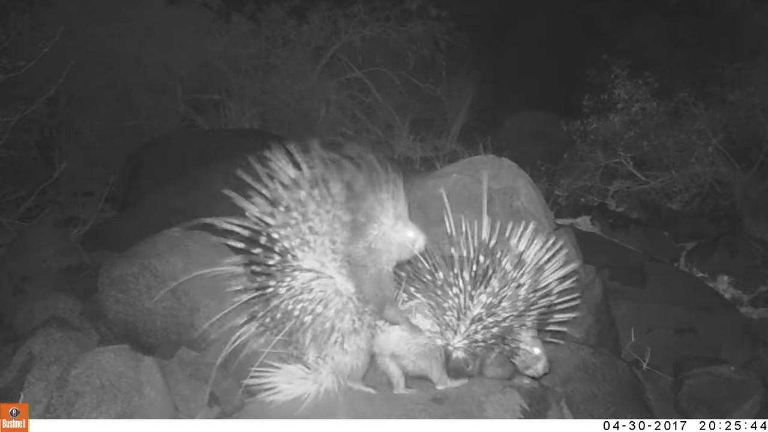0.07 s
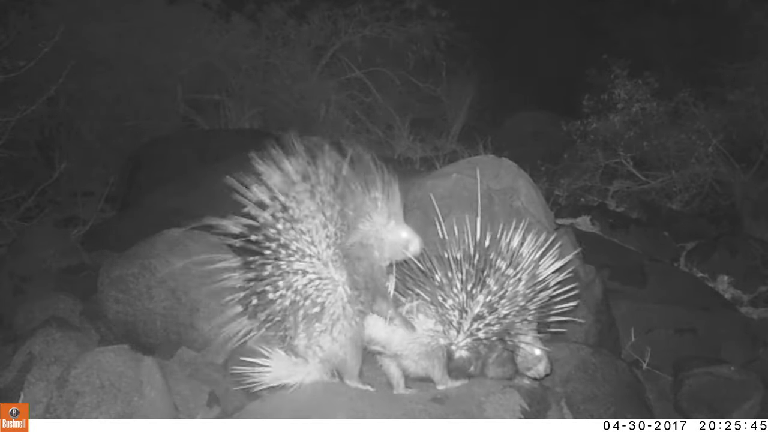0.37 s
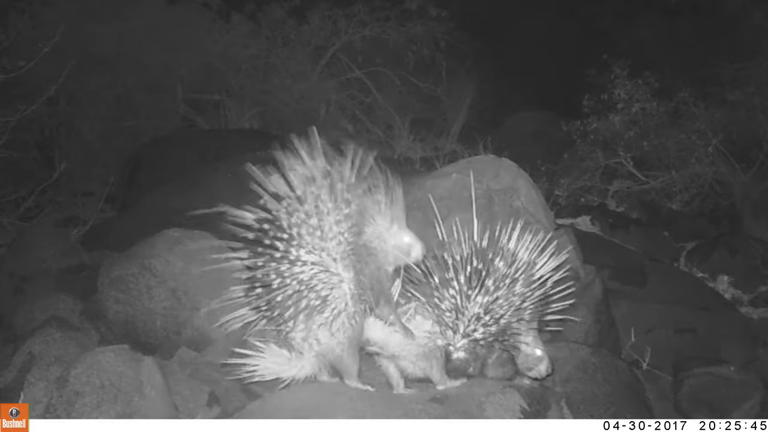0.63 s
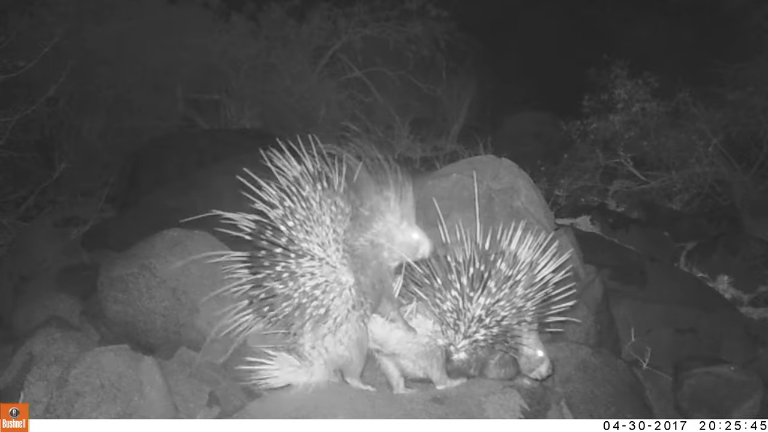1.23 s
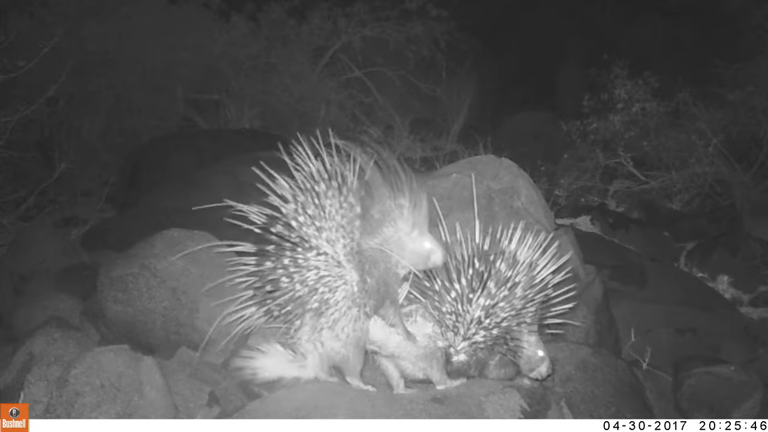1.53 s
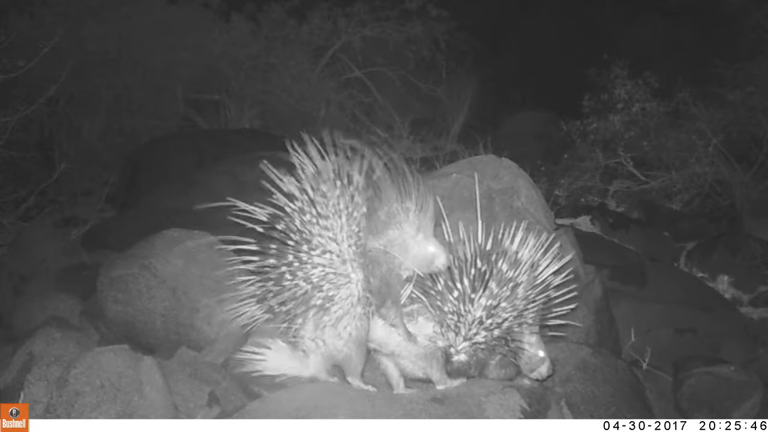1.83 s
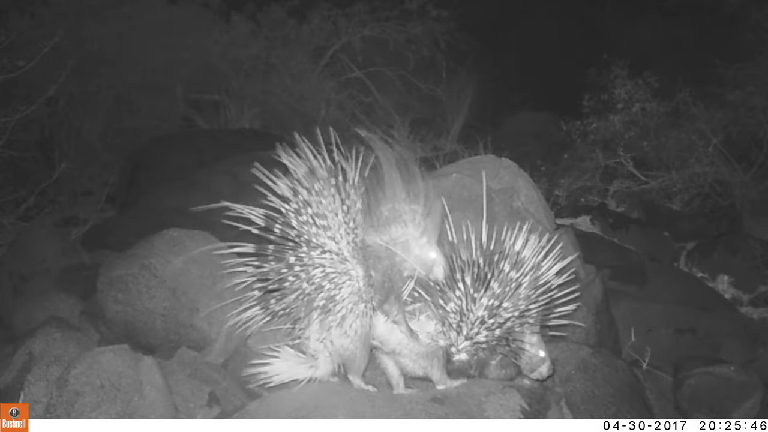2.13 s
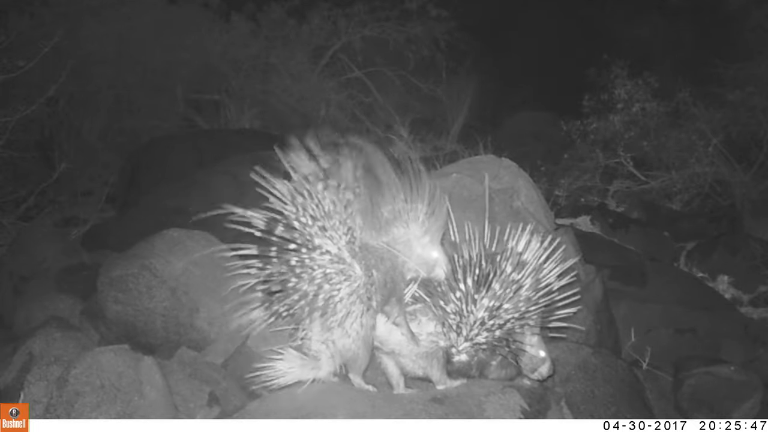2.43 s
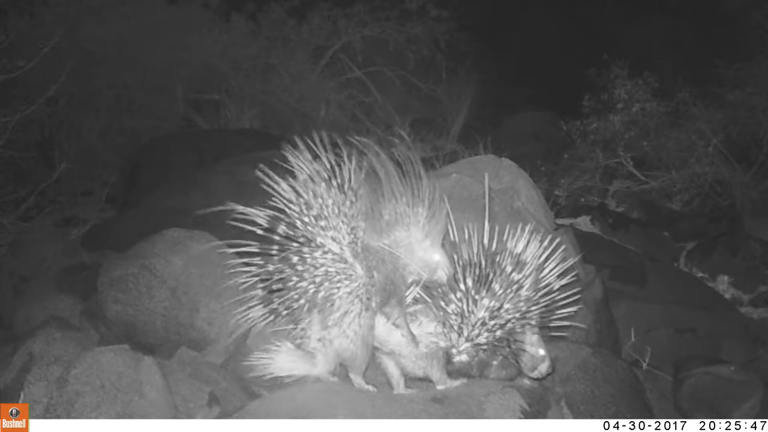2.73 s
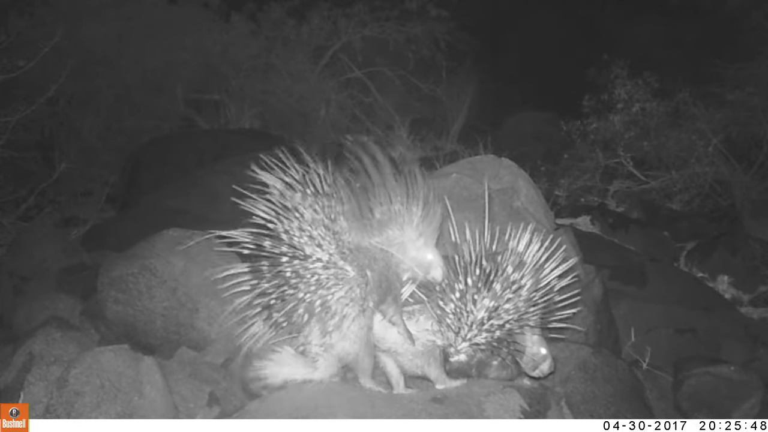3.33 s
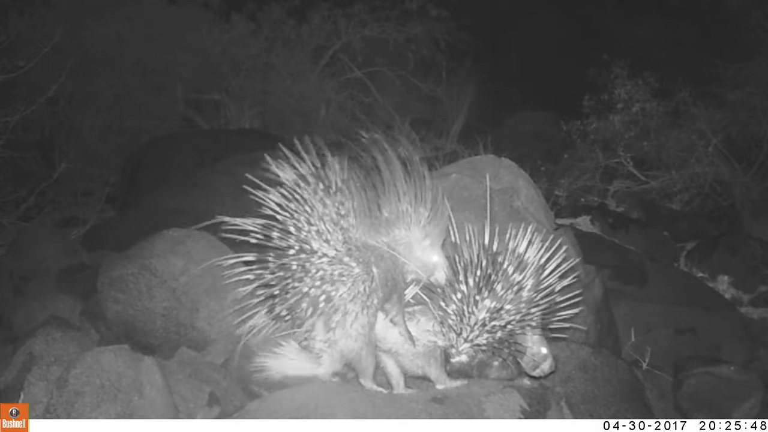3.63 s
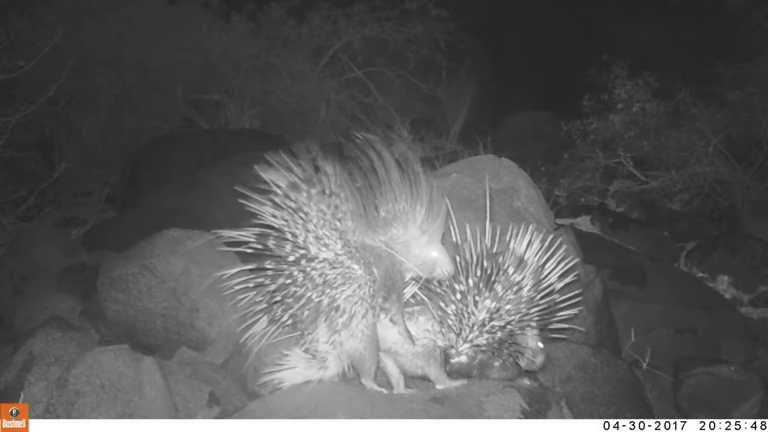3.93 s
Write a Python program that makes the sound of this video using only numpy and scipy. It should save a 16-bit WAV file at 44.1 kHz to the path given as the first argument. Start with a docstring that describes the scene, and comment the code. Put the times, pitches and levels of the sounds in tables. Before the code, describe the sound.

A nearby cricket trills continuously, high and fast, on rocky ground at night. A lower cricket trills far off over soft hiss and electrical hum. Porcupine quills rustle and tick faintly in the first half.

```python
"""Crickets on rocky ground at night.

A near cricket trills by stridulation, each wing stroke a falling whistle in a few lobes, and stumbles
near the end. A lower, quicker cricket trills far off; rocks scatter both. Under them lie soft rustles
from two porcupines' quills, faint high clicks, steady insect song, electrical hum, hiss and rumble."""
import sys
import numpy as np
from scipy import signal
from scipy.fft import rfft, irfft
from scipy.io import wavfile

SR = 44100
rng = np.random.default_rng(int(sys.argv[2]) if len(sys.argv) > 2 else 0)


def unload_audio(sound):
    """Save the sound as a 16-bit wav file, at the path given as the first command line argument."""
    columns = np.transpose(np.atleast_2d(sound))
    # keep every value between -1 and 1, then stretch to whole-number steps
    steps = np.round(np.clip(columns, -1, 1) * 32767)
    wavfile.write(sys.argv[1], SR, steps.astype(np.int16))


N = 176400


def near_cricket():
    """Stridulation: a scraper crosses a file; when it slips, the stroke's timing and attack change."""
    # drift off the beat: t/s, lateness/ms
    drift = [(0, 5.5), (0.431, -1.5), (0.598, 2.5), (1.03, 1.5), (1.249, -2.5), (2.25, -4), (2.781, 3.5),
             (3.098, 1.5), (3.45, -0.8), (3.53, -4.5), (3.699, 3.5), (4, -1.5)]
    # strength of the trill: t/s, level/dB
    levels = [(0, -41.5), (.4, -42.5), (1.2, -42), (1.85, -41.5), (2.6, -43), (3.3, -42.5), (3.75, -44),
              (4, -42.5)]
    # wing tone through one stroke: t/ms, f/Hz
    glide = [(-0.5, 8090), (1, 8004), (4, 7902), (5, 8100), (6.5, 7560), (9, 7700), (10, 7412),
             (13.5, 7400), (15.5, 7100)]
    # swells within one stroke: t/ms, half width/ms, relative level/dB
    lobes = [(2.5, 2.69, 0), (7, 1.2, -2.1), (9.96, 0.69, -3), (14.8, 3.3, -14)]
    # slips of the scraper: t/s, advance/ms, first lobe's gain/dB, whole stroke's gain/dB
    slips = [(.153, 2, -2.5, -1), (1.155, 2, -2.5, 0), (1.607, 1.5, -2, 1), (2.547, 4, -4, 2),
             (3.24, 2.3, 3.5, -1.5), (3.483, 1.5, -3, -4.5), (3.516, 2, -14, 2.5), (3.551, 1, -12, 2),
             (3.589, 1.5, -21, 1.5), (3.625, -0.5, -16, 2.5), (3.661, 2, -16, 2.5)]
    times = stroke_times(rate_hz=28.793, first_s=.0123, drift=drift)
    lobe_db = np.outer(curve(times, levels), np.ones(len(lobes)))
    for at, early_ms, first_db, whole_db in slips:
        k = np.argmin(abs(times - at))
        times[k] -= early_ms / 1000
        lobe_db[k] += whole_db
        lobe_db[k, 0] += first_db
    # the noise of the attack follows the strength of the first lobe
    grip = undb(np.interp(np.arange(N) / SR, times, lobe_db[:, 0] - np.median(lobe_db[:, 0])))
    catch = scrape(times, half_ms=2.2, hz=8516, width_hz=160, db=-71.5)
    snap = scrape(times, half_ms=.91, hz=8850, width_hz=320, db=-75)
    song = trill(times, lobes, lobe_db, glide, rasp=.026, rasp_hz=554)
    return rocks(song + grip * (catch + snap), wet_db=-15)


def stroke_times(rate_hz, first_s, drift):
    """Nearly periodic motion: the wings drift early and late about a steady beat."""
    times = first_s + np.arange(int(N / SR * rate_hz) + 1) / rate_hz
    return times + curve(times, drift) / 1000


def trill(times, lobes, lobe_db, glide, rasp, rasp_hz):
    """Forced vibration: the file drives the wing in a falling tone, modulated by tooth noise."""
    pitch_scatter, scatter_ms, scatter_db = .0021, .13, .47
    tone = np.zeros(N, complex)
    chance = rng.standard_normal((len(times), len(lobes), 4))
    for start, levels, draws in zip(times, lobe_db, chance):
        i = np.arange(max(int((start - .006) * SR), 0), min(int((start + .026) * SR), N))
        ms = (i / SR - start) * 1000
        detune, phase = draws[0, 2:]
        hz = curve(ms, glide) * (1 + pitch_scatter * detune)
        envelope = 0
        for (at, width, db), level, (louder, later, _, _) in zip(lobes, levels, draws):
            gain = undb(db + level + scatter_db * louder)
            envelope += gain * swell(ms, at + scatter_ms * later, width)
        tone[i] += envelope * np.exp(2j * np.pi * (np.cumsum(hz) / SR + phase))
    teeth = resonance(0, rasp_hz) + 1j * resonance(0, rasp_hz)
    return (tone * (1 + rasp * teeth)).real


def scrape(times, half_ms, hz, width_hz, db):
    """Onset transient: the scraper catches with a puff of tooth noise, harder on some strokes."""
    t = np.arange(N) / SR
    nearest = np.searchsorted((times[1:] + times[:-1]) / 2, t)
    ms = (t - times[nearest]) * 1000
    bite_db = 3.5 * rng.standard_normal(len(times))
    return undb(db + bite_db[nearest]) * swell(ms, 0, half_ms) * resonance(hz, width_hz)


def far_cricket():
    """Discrete reflection: a boulder's echo fills the gap after each stroke of a faint, lower trill."""
    # drift off the beat: t/s, lateness/ms
    drift = [(0, -10), (.5, -8), (0.799, -3.5), (1.22, 12), (1.55, 8), (2.3, 2.5), (2.8, -2.5), (3.2, 1.5),
             (4, -0.5)]
    # wing tone through one stroke: t/ms, f/Hz
    glide = [(0, 5650), (2, 5500), (5, 5385), (8.3, 5330), (10.5, 5090), (13, 4950), (16, 4830), (19, 4810)]
    # swells within one stroke: t/ms, half width/ms, relative level/dB
    lobes = [(3.6, 3.2, 0), (8.3, 1, 1.5), (11.5, 1.3, -6.5), (15.5, 2.6, -9)]
    echo_s, echo_db = .01229, -3
    times = stroke_times(rate_hz=39.5, first_s=-.008, drift=drift)
    lobe_db = np.full((len(times), len(lobes)), -67)
    direct = trill(times, lobes, lobe_db, glide, rasp=.15, rasp_hz=675)
    echo = np.pad(direct, (int(echo_s * SR), 0))[:N]
    return rocks(direct + undb(echo_db) * echo, wet_db=-12.5)


def rocks(direct, wet_db, t60_s=.24):
    """Diffuse scattering: rocks and brush add an exponentially decaying tail to the direct sound."""
    t = np.arange(SR // 2) / SR
    tail = rng.standard_normal(len(t)) * np.exp(-np.log(1000) * t / t60_s)
    return direct + undb(wet_db) * signal.fftconvolve(direct, tail / np.linalg.norm(tail))[:N]


def quills(t, roughness):
    """Friction and impact: quills brush, catch and tick together as the porcupines shift."""
    # quill resonances: f/Hz, bandwidth/Hz, relative level/dB
    modes = [(2740, 280, -9), (2070, 180, -11), (2940, 2800, 6)]
    # quills brushing: t/s, half length/s, level/dB
    rustles = [(0.107, 0.095, -74.5), (0.317, 0.046, -76), (0.612, 0.0096, -77), (1.54, 0.0078, -73)]
    # rough ticks of quill on quill: t/s, f/Hz, level/dB
    ticks = [(.113, 2690, -66.5), (.34, 2040, -70), (.414, 2700, -67.5), (.614, 2670, -73),
             (1.122, 2080, -76), (1.35, 2070, -76), (1.402, 2030, -75), (1.452, 2030, -75),
             (1.66, 2040, -73)]
    ring = sum(undb(db) * resonance(hz, width) for hz, width, db in modes)
    rustling = ring / ring.std() * sum(undb(db) * swell(t, at, half) for at, half, db in rustles)
    judder_rad = .8 * resonance(0, 250)
    ticking = sum(undb(db) * swell(t, at, half_width=.0083) * np.sin(2 * np.pi * hz * t + judder_rad)
                  for at, hz, db in ticks)
    return ticking + rustling * roughness


def high_clicks(t, roughness):
    """Gated noise: brief bursts of treble make clusters of faint, high, scratchy clicks."""
    # clusters of clicks: t/s, half length/s, level/dB
    clusters = [(0.105, 0.0056, -82), (0.63, .012, -85), (0.849, .005, -76), (1.39, 0.016, -86),
                (1.45, .016, -88), (2.9, 0.0073, -84), (3.278, .008, -83), (3.312, .006, -82)]
    envelope = sum(undb(db) * swell(t, at, half) for at, half, db in clusters)
    return resonance(hz=9500, width_hz=2000) * envelope * roughness


def scratch(depth_db=2.5, pace_hz=160):
    """Random amplitude modulation: a jagged gain of rms 1 makes a sound scratchy."""
    gain = undb(depth_db * np.clip(resonance(0, pace_hz), -2, 2))
    return gain / np.sqrt(np.mean(gain ** 2))


def insect_bands():
    """Narrow-band noise: steady bands of insect song, including a ring at the far cricket's pitch."""
    # bands of insect song: f/Hz, bandwidth/Hz, level/dB
    bands = [(7250, 97, -72), (7310, 62, -74), (7615, 120, -68), (6980, 610, -74.5), (4877, 70, -85.5),
             (5386, 85, -81.5), (5530, 80, -86.5)]
    return sum(undb(db) * resonance(hz, width) for hz, width, db in bands)


def hum(cycles):
    """Harmonic series: electrical hum sounds at whole multiples of one low frequency."""
    # hum partials: harmonic number, rms level/dB
    partials = [(1, -54.5), (2, -64.5), (3, -69), (4, -67), (6, -73.5), (7, -82.5), (8, -81), (9, -85),
                (11, -86.5), (13, -90)]
    return sum(undb(db) * np.sqrt(2) * np.sin(2 * np.pi * (round(k) * cycles + rng.random()))
               for k, db in partials)


def hiss(cycles):
    """Amplitude modulation: dark noise wavers slightly, and its treble spurts once a hum cycle."""
    # spectrum of the hiss: f/Hz, relative density level/dB
    spectrum = [(12, -3), (30, -4.5), (60, -9), (120, -14.5), (250, -22.5), (380, -26.5), (440, -25.5),
                (550, -32), (780, -33.5), (1000, -37), (1600, -43), (2050, -43), (2500, -45.5),
                (4200, -47.5), (6200, -45.5), (8500, -42.5), (9800, -76.5), (11000, -66), (12200, -56.5)]
    hz, db = np.array(spectrum).T
    colour = lambda f: undb(np.interp(np.log(f + 1), np.log(hz), db))
    treble = signal.sosfilt(signal.butter(2, 263, "high", fs=SR, output="sos"), noise(colour))
    spurts = 1.36 * swell(cycles % 1, centre=.603, half_width=.064) * treble
    steady = noise(colour)
    wander_db = .5 * resonance(0, 4.7)
    return (steady + spurts) * undb(-52.5 + wander_db)


def rumble(t):
    """Narrow-band noise under slow envelopes: the low background swells softly."""
    # low swells: t/s, half length/s, f/Hz, bandwidth/Hz, level/dB
    swells = [(1.793, 0.93, 443, 90, -74), (2.28, 0.22, 98, 50, -64)]
    return sum(undb(db) * swell(t, at, half) * resonance(hz, width) for at, half, hz, width, db in swells)


def resonance(hz, width_hz):
    """Resonant filtering: one band of noise of rms 1; centred on 0 Hz it is a random flutter."""
    return noise(lambda f: 1 / (1 + ((f - hz) / (.52 * width_hz)) ** 2))


def noise(shape):
    """Spectral shaping: white noise weighted by shape(f/Hz), then scaled to rms 1."""
    hz = np.arange(N // 2 + 1) * SR / N
    x = irfft(rfft(rng.standard_normal(N)) * shape(hz), N)
    return x / x.std()


def swell(at, centre, half_width):
    """Gaussian envelope, down to 1/e at half_width from its centre."""
    return np.exp(-((at - centre) / half_width) ** 2)


def curve(at, rows):
    """Linear interpolation through a table of points."""
    return np.interp(at, *np.array(rows, float).T)


def undb(db):
    """Amplitude ratio for a level in decibels."""
    return 10 ** (np.asarray(db) / 20)


def scene():
    """Superposition: all sources add in one channel."""
    t = np.arange(N) / SR
    hum_cycles = 45.63 * t
    insects = near_cricket() + far_cricket() + insect_bands()
    background = hum(hum_cycles) + hiss(hum_cycles) + rumble(t)
    roughness = scratch()
    return (insects + background + quills(t, roughness) + high_clicks(t, roughness))[None]


def record(dry, top_hz=13900):
    """Band limiting: a steep low-pass filter cuts the highest treble."""
    return signal.sosfilt(signal.ellip(8, .2, 70, top_hz, fs=SR, output="sos"), dry)


dry = scene()
out = record(dry)
unload_audio(out)
```